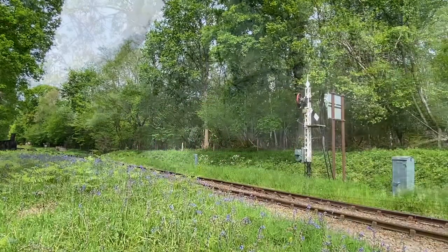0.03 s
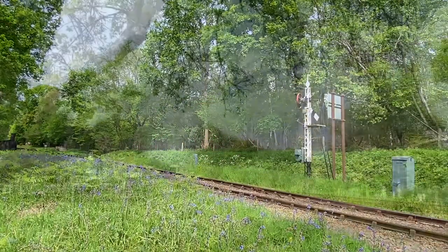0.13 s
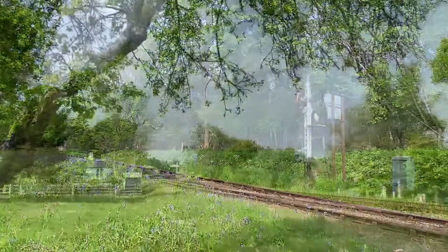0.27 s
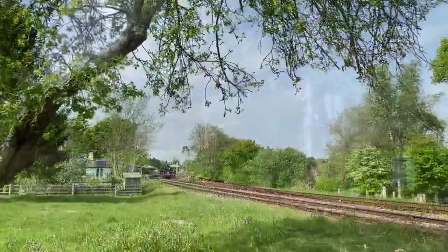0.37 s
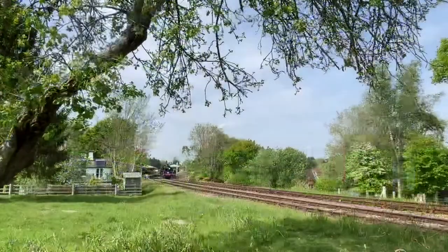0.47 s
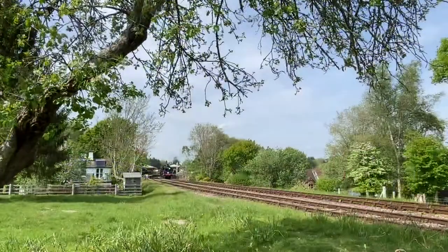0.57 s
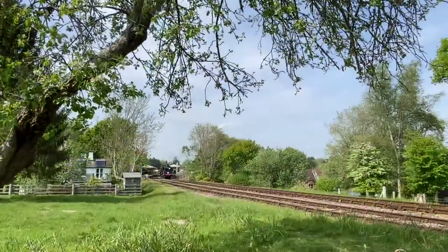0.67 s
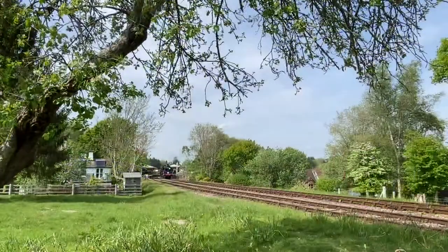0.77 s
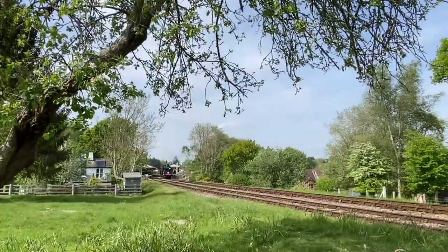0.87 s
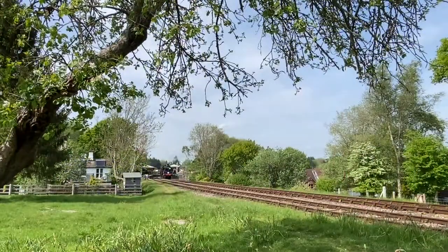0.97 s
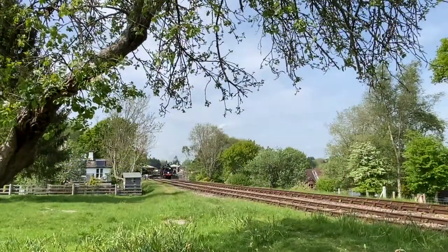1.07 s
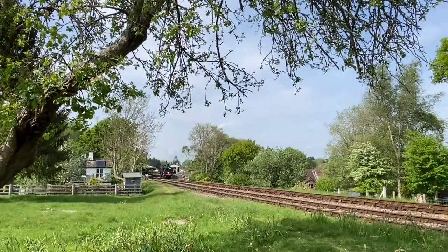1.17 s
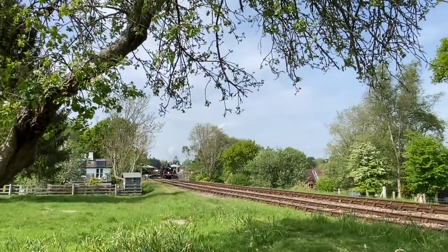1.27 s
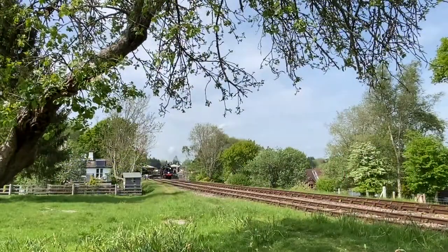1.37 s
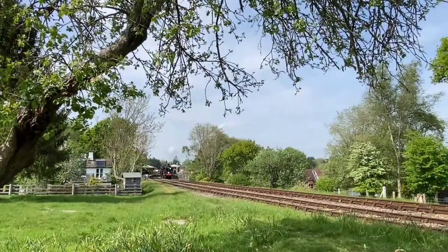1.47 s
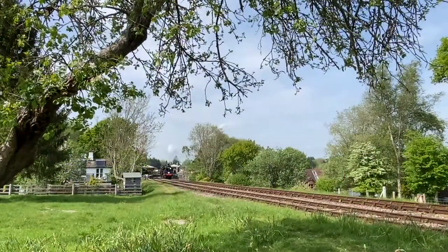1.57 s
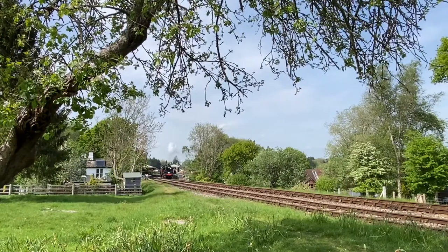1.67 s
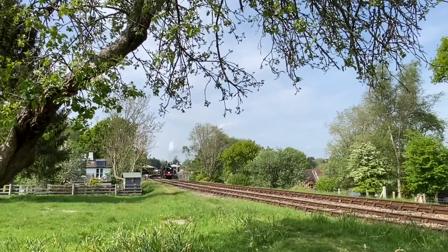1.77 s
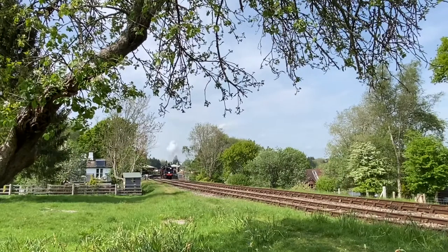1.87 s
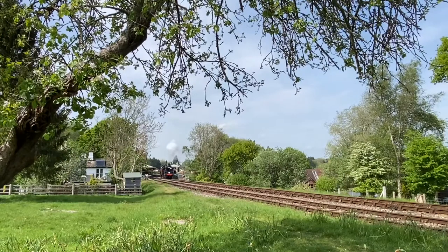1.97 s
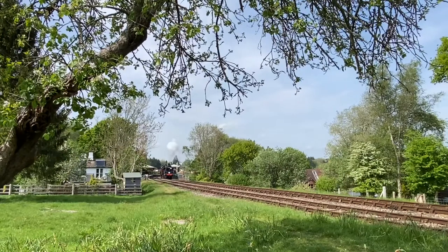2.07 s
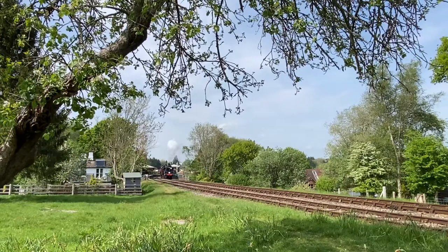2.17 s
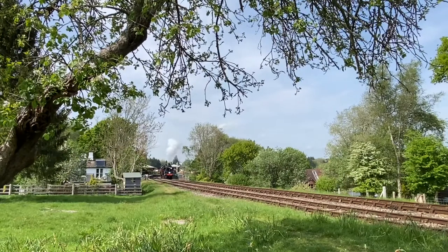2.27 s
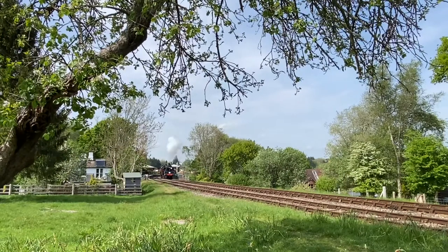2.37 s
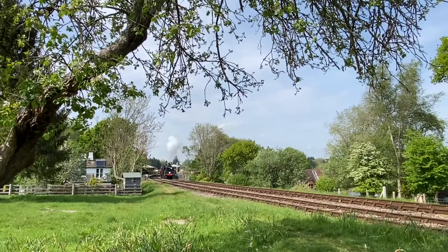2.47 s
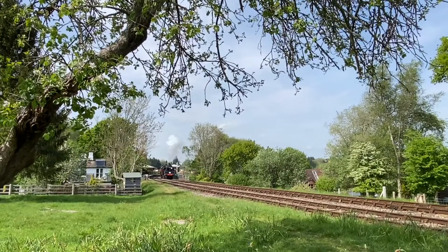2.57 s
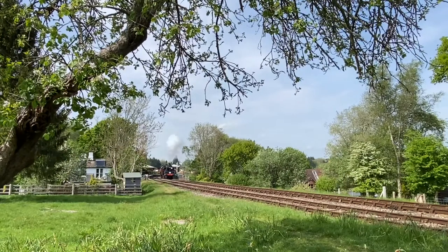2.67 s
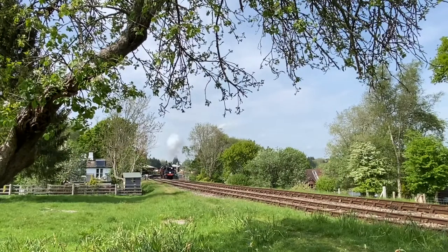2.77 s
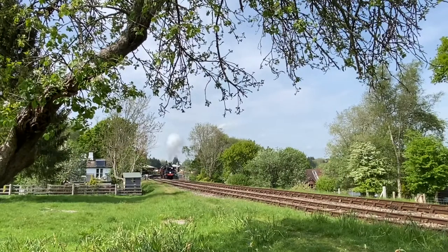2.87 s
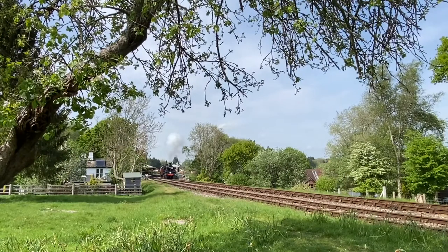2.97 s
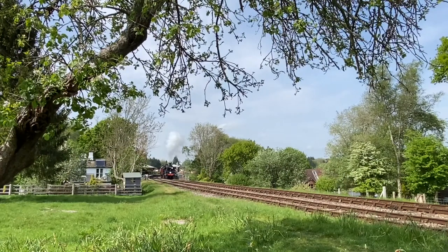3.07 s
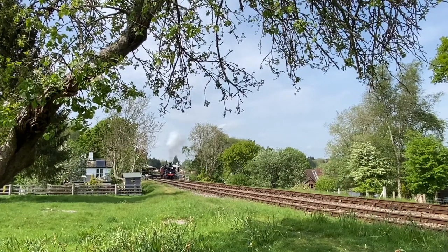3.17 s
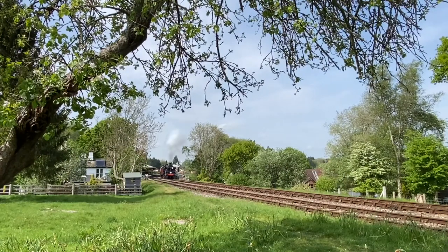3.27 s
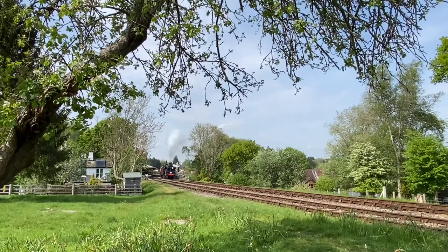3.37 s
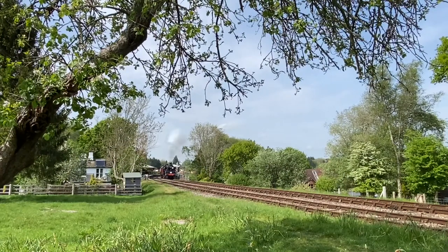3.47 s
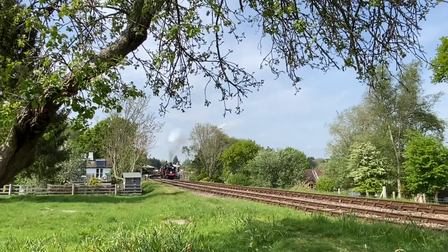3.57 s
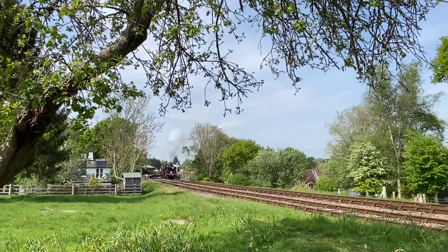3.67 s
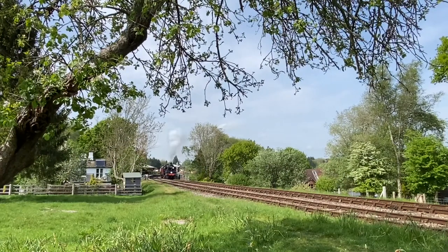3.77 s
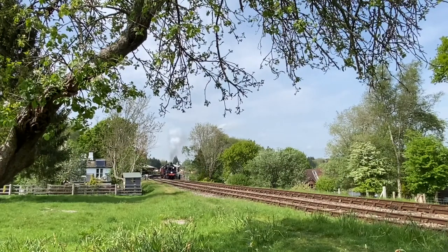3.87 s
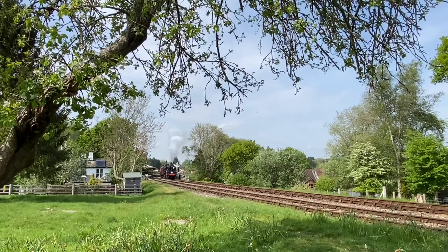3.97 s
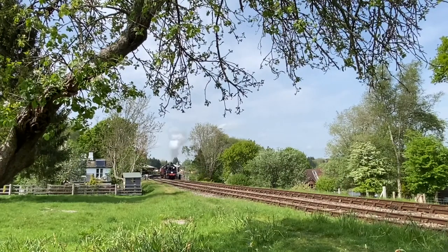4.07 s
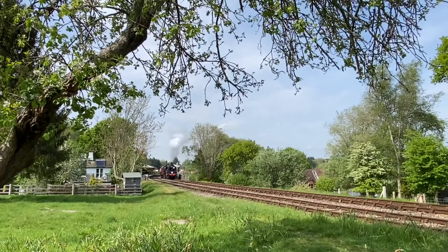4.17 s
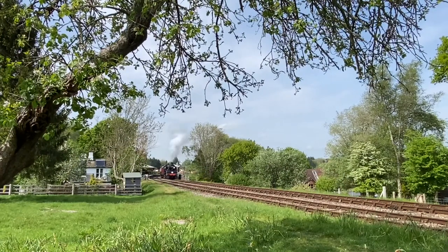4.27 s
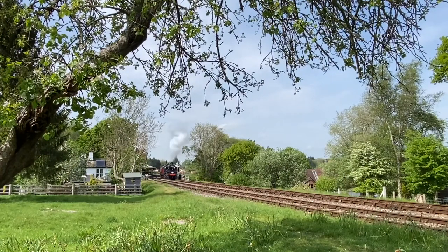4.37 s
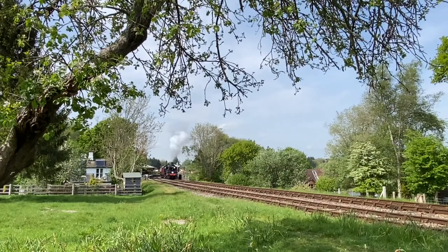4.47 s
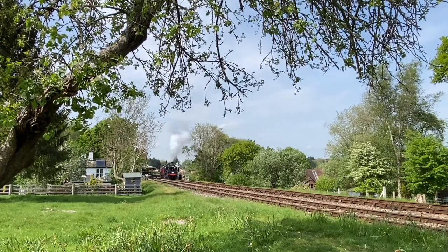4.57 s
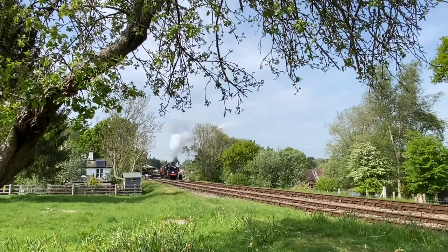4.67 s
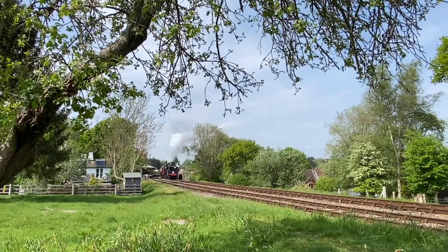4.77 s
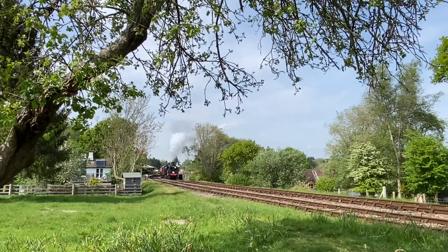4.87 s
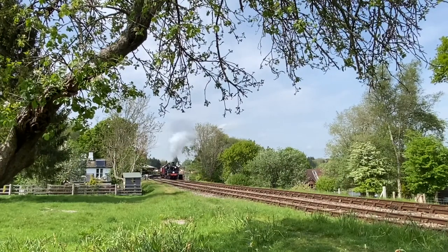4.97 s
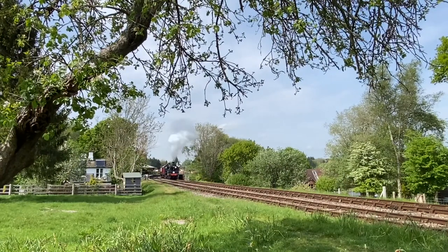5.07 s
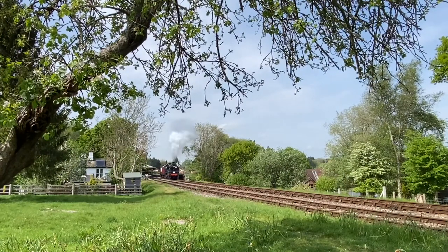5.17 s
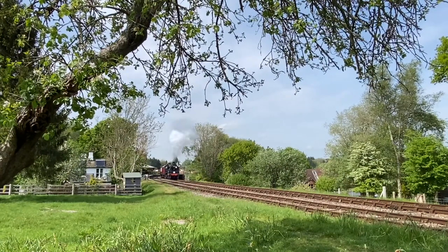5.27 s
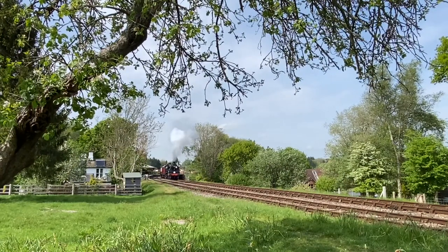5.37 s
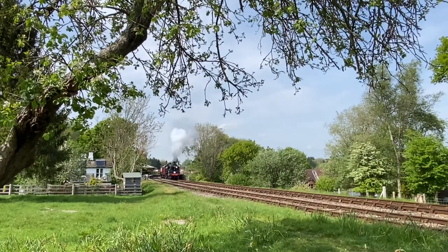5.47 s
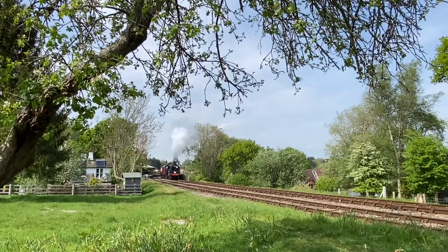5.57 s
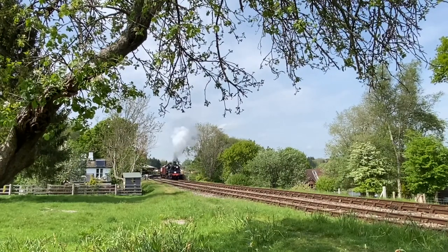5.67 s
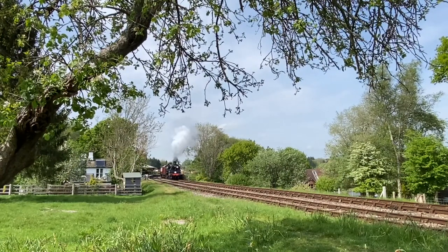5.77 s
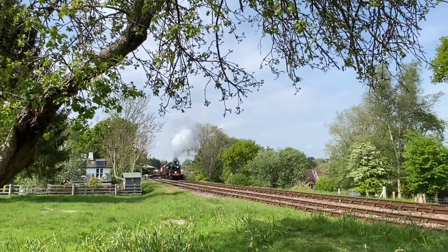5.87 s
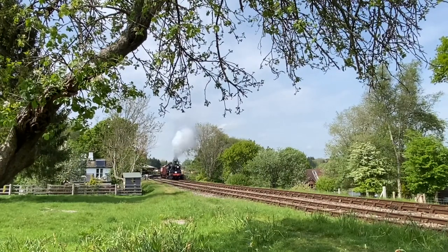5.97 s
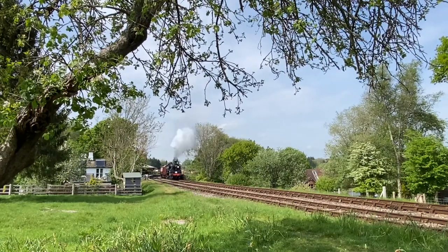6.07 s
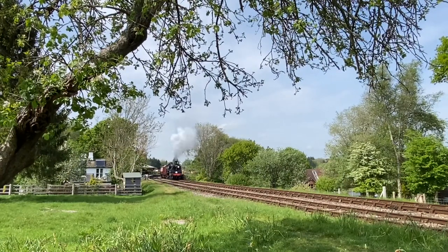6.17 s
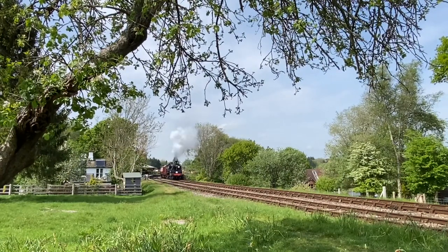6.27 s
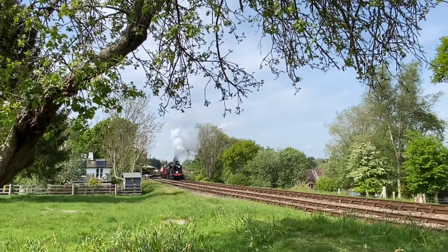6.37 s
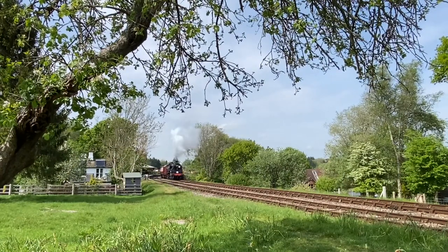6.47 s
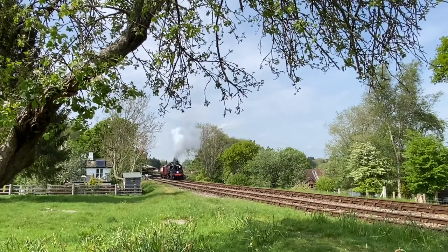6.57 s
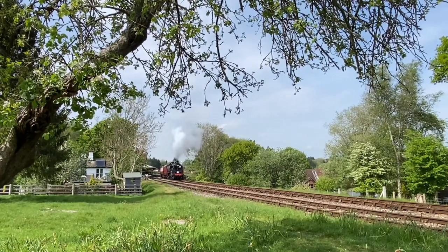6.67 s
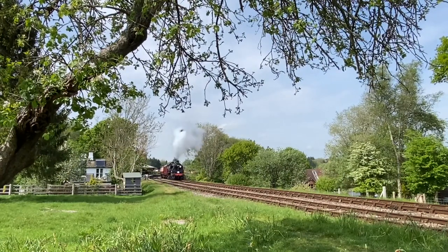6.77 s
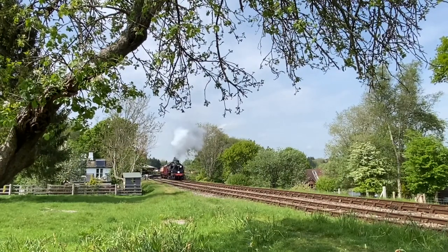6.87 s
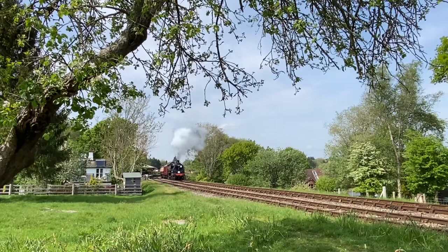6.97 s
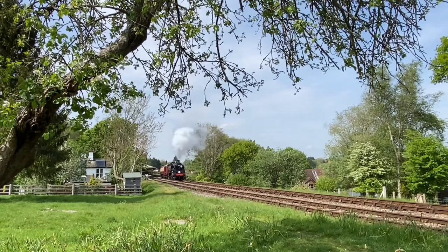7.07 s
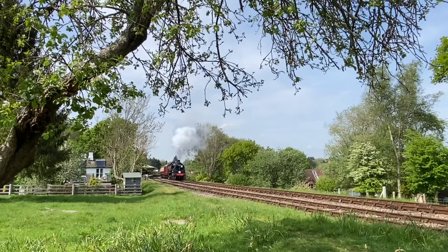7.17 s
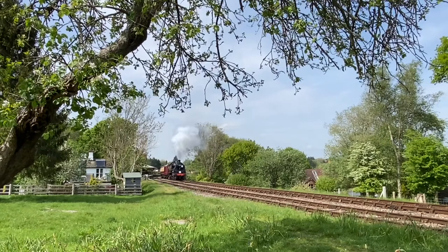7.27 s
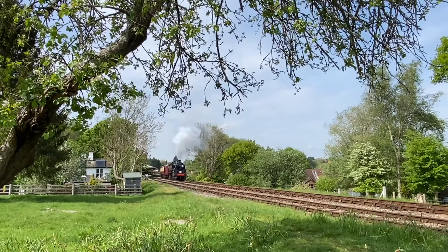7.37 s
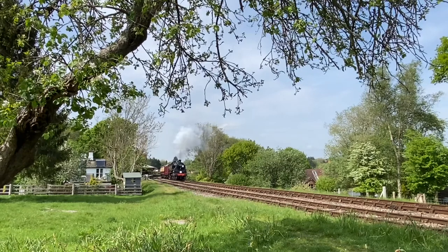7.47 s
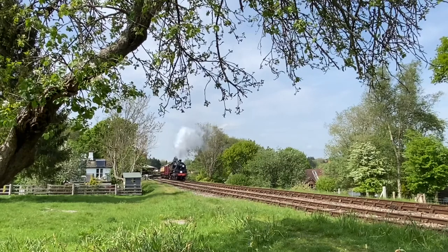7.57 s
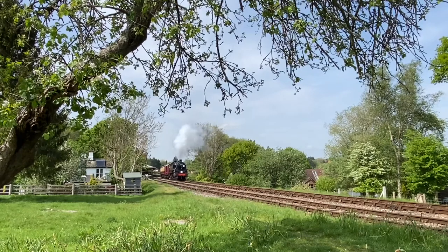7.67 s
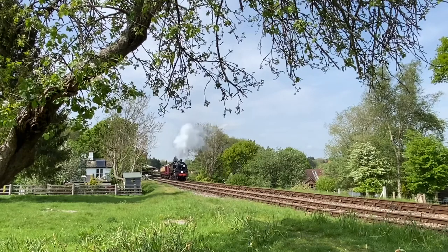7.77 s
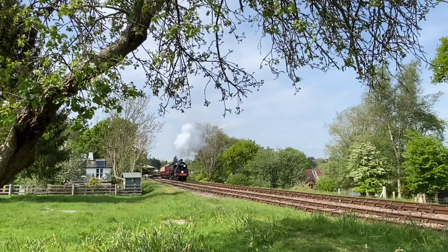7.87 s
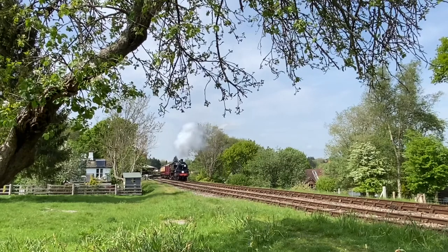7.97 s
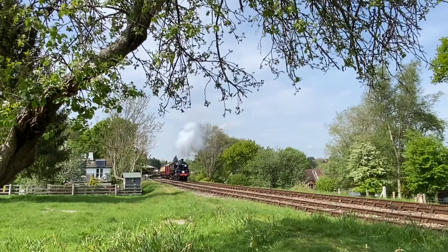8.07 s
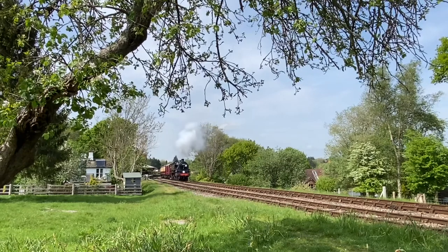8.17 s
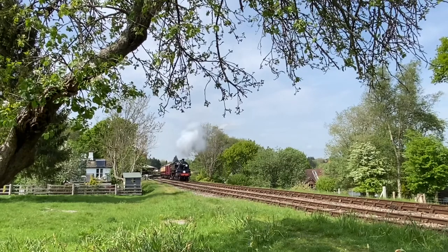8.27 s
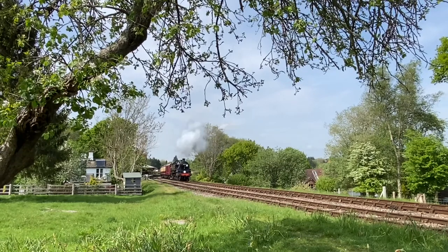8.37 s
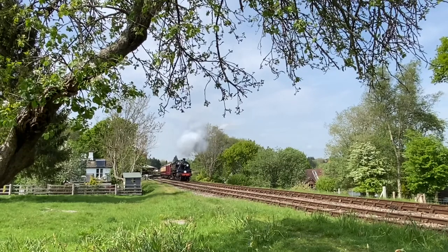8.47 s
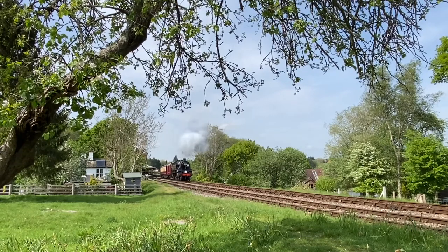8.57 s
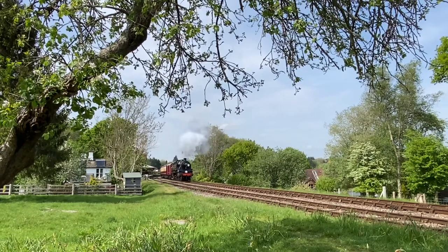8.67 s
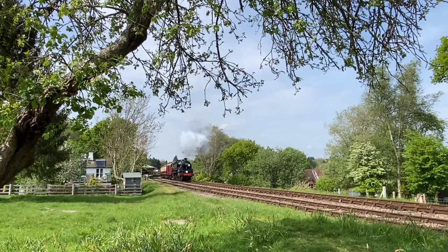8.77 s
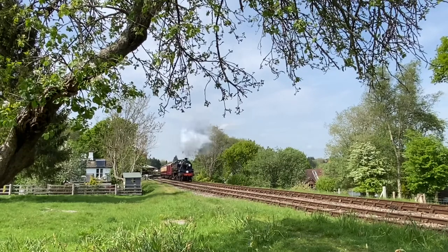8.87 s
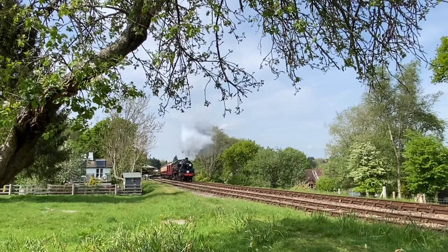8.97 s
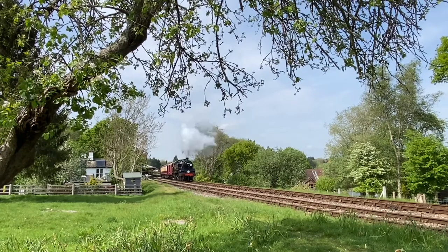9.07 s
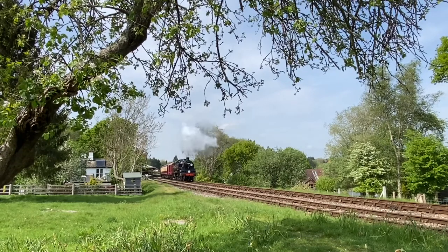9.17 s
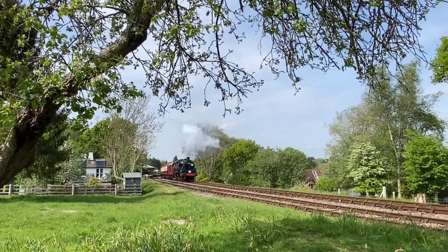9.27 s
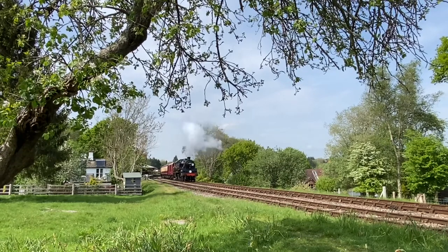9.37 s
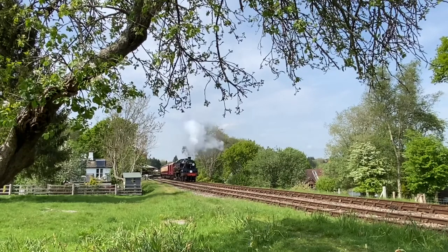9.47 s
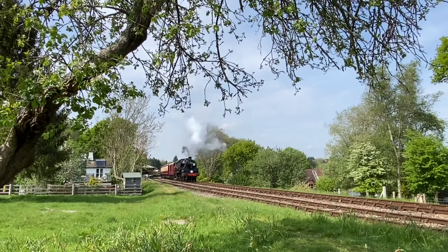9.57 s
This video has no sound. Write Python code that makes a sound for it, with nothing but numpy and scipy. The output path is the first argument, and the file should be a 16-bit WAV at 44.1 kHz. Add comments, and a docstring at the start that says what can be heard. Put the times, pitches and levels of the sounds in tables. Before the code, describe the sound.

A passing train's roar cuts away to near silence, then a steam locomotive's chuffs swell up the line, quicken, and weaken over hissing steam.

```python
"""At first a nearer train's roar, off to the right, fades out within half a second, its bass first.
Faint meadow air, a dying thin band near 4 kHz and small ticks remain. From 1 s a steam engine works hard
up the line towards two microphone ports: each exhaust beat is shaped noise, turbulent steam that rings
smokebox and chimney and echoes off the trees. Beats quicken, swell and later weaken; between them
leaking steam hisses and whistles and the coaches rumble."""
import sys
import numpy as np
from scipy import signal
from scipy.fft import irfft, next_fast_len
from scipy.io import wavfile
from scipy.ndimage import uniform_filter1d

SR = 44100
rng = np.random.default_rng(int(sys.argv[2]) if len(sys.argv) > 2 else 0)


def unload_wav(signal):
    """Save mono or channel-first audio to the path in sys.argv[1] as 16-bit WAV at rate SR, clipped to [-1, 1]."""
    wavfile.write(
        sys.argv[1],
        SR,
        np.round(np.clip(np.atleast_2d(signal).T, -1, 1) * 32767).astype(np.int16),
    )


N = 424276
SIZE = next_fast_len(N)
FREQ_HZ, TIME_S = np.fft.rfftfreq(SIZE, 1 / SR), np.arange(N) / SR

# exhaust beats: peak t/s, strength level/dB, brightness/dB, fizz level/dB
BEATS = [(1.104, -68, -6, -71), (1.562, -61, -2, -62), (1.968, -51, -5, -56), (2.375, -41.5, 2.5, -57),
         (2.738, -33, 5.5, -52), (3.09, -30.5, 4, -53.5), (3.438, -26.5, -1, -50), (3.78, -24.5, -3, -57.5),
         (4.097, -22.5, -3, -51), (4.405, -25, 0, -52), (4.707, -25.5, 5, -51.5), (5.009, -24.5, 3.5, -48),
         (5.297, -23, -0.2, -48.5), (5.573, -24.5, -0.5, -56), (5.842, -24.5, -0.5, -55),
         (6.121, -23.5, 0.5, -48), (6.384, -24, 3.5, -42), (6.633, -23, 3, -45.5), (6.883, -22, 1, -44),
         (7.138, -23.5, 2.5, -46), (7.382, -24, 0.3, -47.5), (7.621, -26.5, -0.5, -48),
         (7.853, -26, -5, -54.5), (8.09, -28, -2.5, -54), (8.329, -30.5, -2.5, -50),
         (8.556, -34, 0.7, -53.5), (8.781, -33.5, -1, -54), (9.015, -38.5, 2, -58), (9.245, -37.5, -2, -62),
         (9.474, -38.5, 2.5, -60)]
# resonances of the blast: f/Hz, width/Hz, level/dB
BOOM_MODES = [(61, 12.5, -1), (80.5, 38, 2.5)]
SMOKEBOX_MODES = [(185.9, 61.6, 1), (235.5, 23, -3.5), (343.4, 116, -9)]
LOW_CHIMNEY_MODES = [(581.4, 57.5, -4.5), (790, 120, -1.5), (900, 33, -6)]
MID_CHIMNEY_MODES = [(1205, 260, -3.5), (1063, 83, -4)]
HIGH_CHIMNEY_MODES = [(1573, 240, -3), (1970, 580, -10)]
RASP_MODES = [(2120, 860, 7.5), (2840, 710, 10), (3470, 420, 0)]
# steam jet and fizz spectra: f/Hz, level/dB
JET_SPECTRUM = [(3300, 8), (4200, 9.5), (5500, 4), (6500, -0.5), (7900, -7.5)]
FIZZ_SPECTRUM = [(7600, 6), (8200, 4), (10000, 4), (12000, -4.5), (14000, -13), (15800, -24)]
# rows: low chimney, boom, smokebox, mid chimney, high chimney, rasp, jet
# usual-beat level/dB, slope on strength/(dB/dB), slope on brightness/(dB/dB), drift/(dB/s)
PART_LEVELS = [(-24, 1, -0.07, -0.18), (-30, 0.95, 0.25, 2.5), (-26.5, 1.09, 0.24, 1.21),
               (-24.5, 1.12, 0.77, 1.24), (-24.5, 1.06, 0.75, -0.14), (-29.5, 1.07, 0.95, -0.67),
               (-39, 0.7, 0.78, 0.27)]
# same rows, then fizz: lag/s, rise/s, fall/s, echo level/dB, echo t60/s (limited in beats()), flutter/dB
# rise, fall and t60 are for the usual gap between beats
PART_SHAPES = [(0.001, 0.035, 0.046, -17, 1.2, 0.5), (0.01, 0.059, 0.073, -17.5, 2.4, -0.5),
               (0.012, 0.047, 0.06, -20.5, 1.2, 2), (0.001, 0.036, 0.047, -18, 0.7, 0),
               (0.001, .034, 0.042, -15.5, 0.57, 0), (0.001, .036, .055, -10, 1.2, 1.5),
               (0.001, 0.047, 0.076, -7.5, 1.03, 1.5), (0.001, 0.041, 0.055, -17, 0.91, 1)]
# dip from the chimney's ground echo, lower as the engine nears: t/s, f/Hz
GROUND_NOTCH = [(1, 4900), (4.7, 3900), (6.5, 2290), (9.62, 1900)]
# steam leaking from the cylinders: t/s, hiss level/dB, pipe tone level/dB, high whistle level/dB
LEAK_LEVELS = [(1.9, -105.5, -101, -101), (2.18, -58, -56.5, -75), (2.87, -44, -43.5, -57),
               (4.09, -47, -48.5, -53), (4.7, -45.5, -40.5, -53), (5.38, -46, -56, -46),
               (6.52, -42, -48, -46), (7.68, -42, -50, -49), (8.2, -41.5, -45.5, -43.5),
               (8.97, -40, -47.5, -36.5), (9.3, -42.5, -54, -44), (9.62, -38.5, -52, -63.5)]
# leak hiss spectrum: f/Hz, level/dB
LEAK_HISS_SPECTRUM = [(1500, -37), (2300, -16), (3500, 1), (5500, -4), (7000, -15.5), (9000, -27),
                      (12000, -30), (15800, -54)]
# leak resonances: f/Hz, width/Hz, level/dB
LEAK_TONE_MODES = [(2460, 140, -3.5), (2500, 60, 0), (2770, 48, 2), (3188, 51, 3), (3560, 130, -3),
                   (5300, 110, -5.5), (5230, 81, -20)]
WHISTLE_MODES = [(4190, 190, 0)]
# wheels and motion: t/s, rumble level/dB, clatter level/dB
ROLLING_LEVELS = [(1.9, -82, -67), (2.52, -69, -53), (2.87, -63, -45), (3.96, -42.5, -42), (5.49, -40, -40),
                  (7.42, -36.5, -38), (7.9, -39.5, -42), (9.62, -40.5, -44.5)]
# rumble and clatter spectra: f/Hz, level/dB
RUMBLE_SPECTRUM = [(30, -40), (50, 7.5), (80, 8), (120, 0.5), (200, -5.5), (300, -22), (400, -63.5)]
CLATTER_SPECTRUM = [(200, -13), (400, -3.5), (650, -3.5), (740, 1.5), (800, 8), (900, -2), (1100, -1),
                    (1450, 1), (2000, -5), (2600, -8.5)]
# nearer train: t/s, roar level/dB, bass level/dB
PASSING_LEVELS = [(0.0, -37, -36), (0.064, -39, -44.5), (0.17, -43.5, -48), (0.338, -53.5, -56),
                  (0.404, -61, -69), (0.47, -90, -83)]
# its spectra: f/Hz, level/dB
PASSING_ROAR_SPECTRUM = [(300, -13), (550, -8.5), (900, -14), (1400, -7.5), (2000, -10), (2800, -8),
                         (4000, -6.5), (5500, -15), (7000, -20.5), (11000, -31.5), (15800, -42)]
PASSING_BASS_SPECTRUM = [(25, -7), (80, -2), (170, 0), (300, -5.5), (450, -39)]
# quiet meadow spectrum: f/Hz, level/dB
MEADOW_SPECTRUM = [(40, -9), (200, -4.5), (500, 2), (1000, -7.5), (1500, 3), (2300, -9.5), (5000, -14.5),
                   (7700, -13.5), (8100, 2.5), (10000, -3.5), (12000, -17), (14000, -41)]
# its level: t/s, level/dB
MEADOW_LEVELS = [(.4, -65), (1, -66), (1.4, -66), (1.6, -65), (1.9, -64.5), (2.2, -64.5), (2.7, -72)]
# faint thin band: f/Hz, width/Hz, level/dB
THIN_MODES = [(3930, 300, 0)]
# its level: t/s, level/dB
THIN_LEVELS = [(0, -68), (.7, -74.5), (1.1, -84), (1.5, -100)]
# ticks: t/s, level/dB, f/Hz, width/Hz (lower band edge at least 50 Hz)
TICKS = [(.154, -41, 5500, 5990), (1.025, -61, 1195, 1600), (1.361, -59, 900, 1380)]
# surfaces close to the ports: delay/s, share/(0-1)
NEAR_BOUNCES = [(.00122, 0.06), (.00217, 0.07), (.00433, .14)]
# stereo phase, left ahead of right: f/Hz, phase/rad; chosen by band, stepped above 7 kHz
STEREO_PHASE = [(0, -.4), (300, -.45), (440, -.2), (520, .8), (700, 1.4), (1100, .9), (1700, 1),
                (2300, 1.7), (3200, 2), (4200, 2), (5500, 2.9), (7300, 0), (8700, -3.14), (9500, -3.14),
                (10400, -6.28), (11700, -6.28), (12500, -9.42), (14000, -9.42), (14600, -12.57),
                (16400, -12.57)]
# stereo likeness of left and right: f/Hz, likeness/(0-1); chosen by band
STEREO_LIKENESS = [(50, .99), (300, .96), (600, .8), (900, .95), (1900, .94), (2400, .78), (3500, .78),
                   (5300, .85), (6800, .5), (8500, .999), (9400, .999), (10000, .55), (10500, .999),
                   (11700, .999), (12200, .4), (12600, .999), (13900, .999), (14300, .4), (14700, .999)]
# stereo balance: f/Hz, left minus right level/dB
STEREO_BALANCE = [(60, -.3), (280, 0), (450, -4), (600, -5), (720, 0), (1400, 0), (1900, -4.5), (2400, -.6),
                  (4300, 1), (6200, -4), (7200, 2.5), (9000, 0)]

USUAL_STRENGTH_DB, USUAL_TIME_S, USUAL_GAP_S = -25, 5, 0.29
STRETCH_POWER = 0.72  # beat length follows the gap between beats to this power
GROUND_SHARE = 0.27
PASSING_LEFT_LAG_S = 0.000378
STREAK_RMS_DB = 1.6
LOW_EDGE_HZ, HIGH_EDGE_HZ = 42, 16000
UP_LINE, OFF_RIGHT = "up the line", "off to the right"
STEREO_GAINS = {}  # by direction, computed once


def beats():
    """Each part swells with the blast, falls as the cylinder empties and hangs on as echo."""
    part_modes = (LOW_CHIMNEY_MODES, BOOM_MODES, SMOKEBOX_MODES, MID_CHIMNEY_MODES,
                  HIGH_CHIMNEY_MODES, RASP_MODES)
    spectra = [modes(rows) for rows in part_modes]
    spectra += [colour(JET_SPECTRUM), colour(FIZZ_SPECTRUM)]
    flutter = wander(top_hz=70)
    out = np.zeros((2, N))
    times_s, strength_db, bright_db, fizz_db = np.transpose(BEATS)
    stretches = (np.gradient(times_s) / USUAL_GAP_S) ** STRETCH_POWER

    levels = []
    for usual_db, by_strength, by_bright, drift_db_per_s in PART_LEVELS:
        level_db = usual_db + by_strength * (strength_db - USUAL_STRENGTH_DB)
        level_db = level_db + by_bright * bright_db
        levels.append(level_db + drift_db_per_s * (times_s - USUAL_TIME_S))
    levels.append(fizz_db)

    for gain, shape, levels_db in zip(spectra, PART_SHAPES, levels):
        lag_s, rise_s, fall_s, echo_db, t60_s, flutter_db = shape
        t60_s = np.clip(t60_s, 0.3, 2.0)
        power = np.zeros(N)
        for peak_s, level_db, stretch in zip(times_s, levels_db, stretches):
            span = slice(int((peak_s - 0.15) * SR), int((peak_s + 0.6) * SR))
            t = (TIME_S[span] - peak_s - lag_s) / stretch
            rise = (abs(t) / rise_s) ** 2.52
            fall = (abs(t) / fall_s) ** 1.21
            blast = np.exp(-2 * np.where(t < 0, rise, fall))
            onset = 1 / (1 + np.exp(-t / 0.0053))
            echo = gain_of(2 * echo_db - 120 * t / t60_s) * onset  # doubled dB: power
            power[span] += gain_of(2 * level_db) * (blast + echo)
        # one shared random flutter; each part has its own depth, none for mid chimney, reversed for boom
        out += noise(gain) * np.sqrt(power) * gain_of(flutter_db * flutter)
    return out


def ground_echo(x):
    """Adds the bounce off the meadow, half a period of the notch frequency late."""
    notch_hz = np.interp(TIME_S, *np.transpose(GROUND_NOTCH))
    sample = np.arange(N)
    late = sample - SR / (2 * notch_hz)
    bounce = np.array([np.interp(late, sample, channel) for channel in x])
    return (x + GROUND_SHARE * bounce) / (1 + GROUND_SHARE)


def leak():
    """Leaking steam: hiss, fuzzy pipe tones and a whistle with its own level, under shared gusts."""
    gusts_db = 1.2 * wander(top_hz=12)
    hiss = noise(colour(LEAK_HISS_SPECTRUM)) * gain_of(curve(LEAK_LEVELS) + gusts_db)
    tones = noise(modes(LEAK_TONE_MODES)) * gain_of(curve(LEAK_LEVELS, column=2) + gusts_db)
    whistle = noise(modes(WHISTLE_MODES)) * gain_of(curve(LEAK_LEVELS, column=3) + gusts_db)
    return hiss + tones + whistle


def rolling():
    """Lumpy low noise for the coaches, steadier mid-band noise for the clatter of the motion."""
    rumble_db = curve(ROLLING_LEVELS) + 2.7 * wander(top_hz=4.8)
    rumble = noise(colour(RUMBLE_SPECTRUM)) * gain_of(rumble_db)
    clatter_db = curve(ROLLING_LEVELS, column=2) + 0.66 * wander(top_hz=18)
    clatter = noise(colour(CLATTER_SPECTRUM)) * gain_of(clatter_db)
    return rumble + clatter


def passing():
    """A nearer train as fading roar and bass noise, later at the left port."""
    t_s, roar_db, bass_db = np.transpose(PASSING_LEVELS)
    roar_now_db = np.interp(TIME_S, t_s, roar_db, right=-140) + 0.89 * wander(top_hz=40)
    bass_now_db = np.interp(TIME_S, t_s, bass_db, right=-140)
    roar = noise(colour(PASSING_ROAR_SPECTRUM), OFF_RIGHT) * gain_of(roar_now_db)
    bass = noise(colour(PASSING_BASS_SPECTRUM), OFF_RIGHT) * gain_of(bass_now_db)
    return roar + bass


def meadow():
    """Faint air noise, a thin band near 4 kHz that dies away, and ticks of windowed band noise."""
    air_db = np.interp(TIME_S, *np.transpose(MEADOW_LEVELS)) + 1.0 * wander(top_hz=10)
    out = noise(colour(MEADOW_SPECTRUM)) * gain_of(air_db)
    out += noise(modes(THIN_MODES)) * gain_of(curve(THIN_LEVELS))
    length = 300  # samples
    for t_s, level_db, hz, width_hz in TICKS:
        edges_hz = [max(hz - width_hz / 2, 50), hz + width_hz / 2]
        band = signal.butter(2, edges_hz, "bandpass", fs=SR)
        burst = evened(signal.lfilter(*band, rng.standard_normal((2, length))))
        start = round(t_s * SR)
        out[:, start:start + length] += gain_of(level_db) * burst * np.hanning(length)
    return out


def shifting_air(x):
    """Warm air over the long path briefly lifts and dims narrow streaks; the bass is spared."""
    hz, _, z = signal.stft(x, SR, nperseg=1024)
    streaks = uniform_filter1d(rng.standard_normal(z.shape[1:]), size=3, axis=0)  # over frequency
    streaks = uniform_filter1d(streaks, size=20, axis=1)  # over time
    depth_db = STREAK_RMS_DB * np.clip(hz / 800, 0, 1)[:, None]  # full from 800 Hz up
    return signal.istft(z * gain_of(depth_db * evened(streaks)), SR, nperseg=1024)[1][:, :N]


def near_echoes(x):
    """Single bounces off close surfaces ripple the spectrum."""
    taps = np.zeros(256)
    taps[0] = 1
    for delay_s, share in NEAR_BOUNCES:
        taps += share * np.sinc(np.arange(len(taps)) - delay_s * SR)  # fractional delay
    return signal.oaconvolve(x, taps[None])[:, :N]


def stereo_gains(where):
    """Spectral gains: shared noise to left, shared to right, unrelated noise to right."""
    if where not in STEREO_GAINS:
        if where == UP_LINE:
            phase_rad = np.interp(FREQ_HZ, *np.transpose(STEREO_PHASE))
        else:
            phase_rad = -2 * np.pi * FREQ_HZ * PASSING_LEFT_LAG_S
        alike = read(STEREO_LIKENESS)
        side = gain_of(read(STEREO_BALANCE) / 2)  # half the difference on each channel
        shared_right = alike * np.exp(-1j * phase_rad) / side
        STEREO_GAINS[where] = side, shared_right, np.sqrt(1 - alike ** 2) / side
    return STEREO_GAINS[where]


def noise(gain, where=UP_LINE):
    """Steady stereo noise of the given spectrum, rms 1 over the pair."""
    shared, other = rng.standard_normal((2, 2 * len(FREQ_HZ)), np.float32).view(np.complex64)
    left, right, apart = stereo_gains(where)
    pair = np.array([shared * left, shared * right + other * apart])
    return evened(irfft(gain * pair, SIZE)[:, :N])


def wander(top_hz):
    """Slow random curve of rms 1; its spectrum falls as a Gaussian, to 1/e at top_hz."""
    steps = N // 64 + 1
    z = rng.standard_normal((steps // 2 + 1, 2)) @ [1, 1j]
    hz = np.arange(len(z)) * SR / N
    slow = irfft(z * np.exp(-(hz / top_hz) ** 2), steps)
    return np.interp(TIME_S, np.linspace(0, TIME_S[-1], steps), evened(slow))


def modes(rows):
    """Spectral gain of resonances whose powers add."""
    power = 0
    for hz, width_hz, level_db in rows:
        offset = 2 * (FREQ_HZ - hz) / width_hz
        power = power + (gain_of(level_db) / (1 + offset ** 2 / 2)) ** 2
    return np.sqrt(power)


def colour(points):
    """Spectral gain from a dB table, silent outside it."""
    inside = (FREQ_HZ > points[0][0]) * (FREQ_HZ < points[-1][0])
    return gain_of(read(points)) * inside


def read(points):
    """Table over frequency, interpolated on a log axis."""
    hz, value = np.transpose(points)
    return np.interp(np.log(FREQ_HZ + 1), np.log(hz + 1), value)


def curve(rows, column=1):
    """One column of a time table in dB, -140 dB before it starts."""
    rows = np.array(rows)
    return np.interp(TIME_S, rows[:, 0], rows[:, column], left=-140)


def gain_of(db):
    """Decibels to amplitude gain."""
    return 10 ** (np.asarray(db) / 20)


def evened(x):
    """Scales to rms 1."""
    return x / np.sqrt(np.mean(x ** 2) + 1e-20)


def scene():
    """All sources at the ports; the nearer train skips the long air path and the near echoes."""
    far = ground_echo(beats()) + leak() + rolling() + meadow()
    return near_echoes(shifting_air(far)) + passing()


def record(dry):
    """The small microphones lose the deepest bass; then the band limit."""
    highpass = signal.butter(3, LOW_EDGE_HZ, "highpass", fs=SR, output="sos")
    thinned = signal.sosfilt(highpass, dry)
    lowpass = signal.firwin(511, HIGH_EDGE_HZ, window=("kaiser", 9), fs=SR)
    return signal.oaconvolve(thinned, lowpass[None], "same")


dry = scene()
out = record(dry)
unload_wav(out)
```